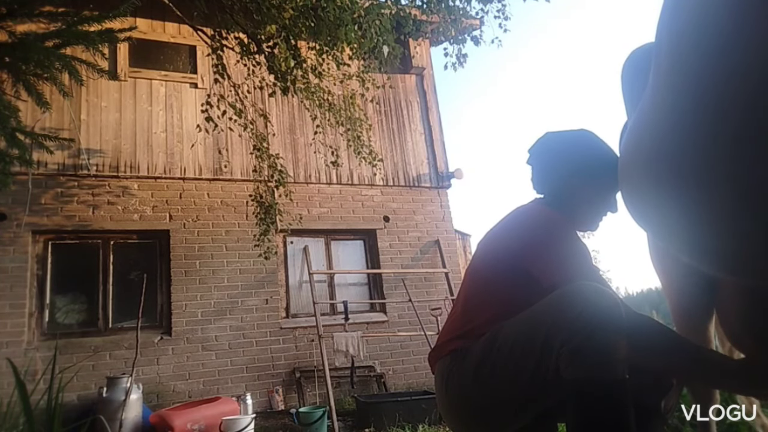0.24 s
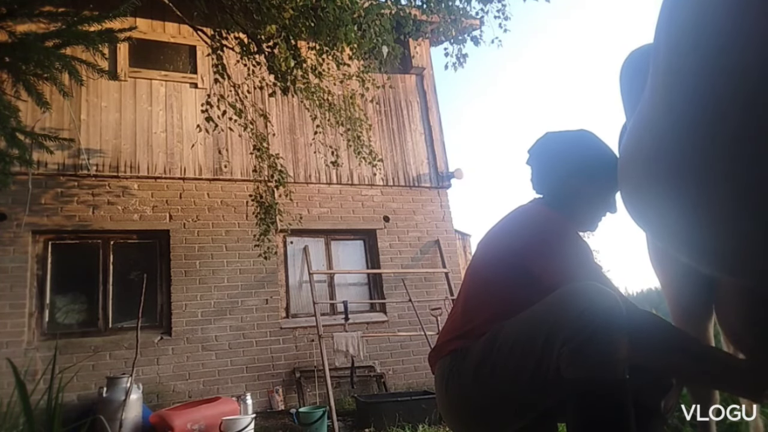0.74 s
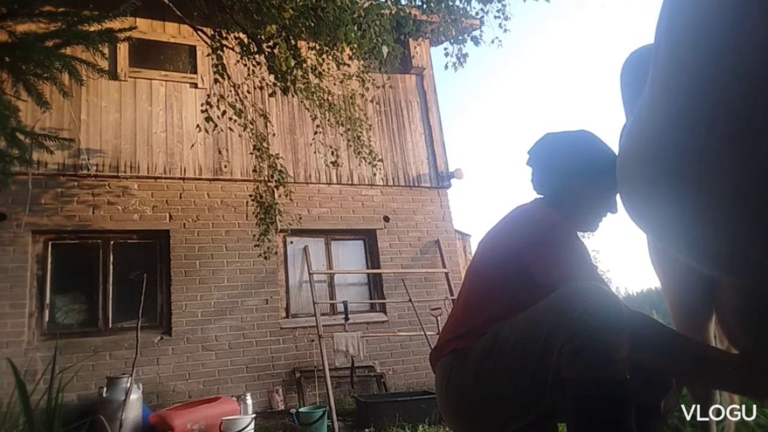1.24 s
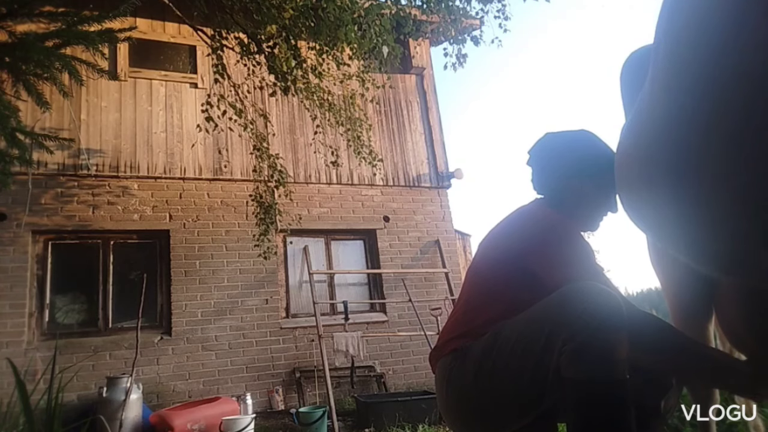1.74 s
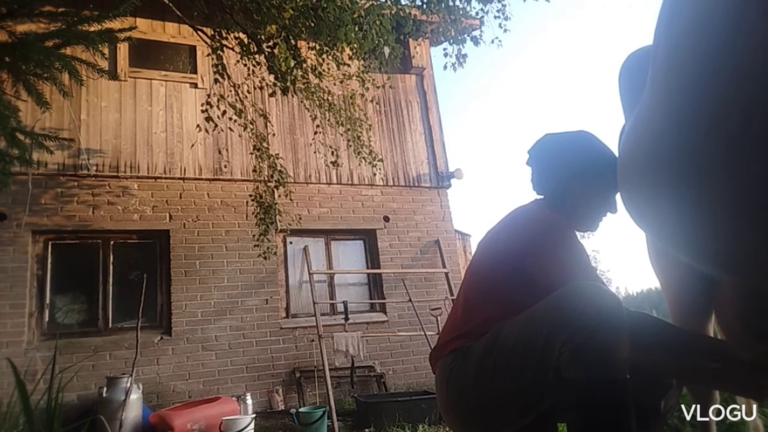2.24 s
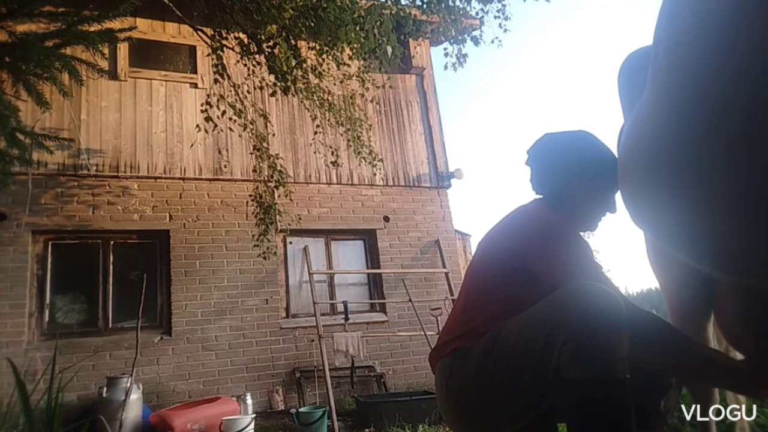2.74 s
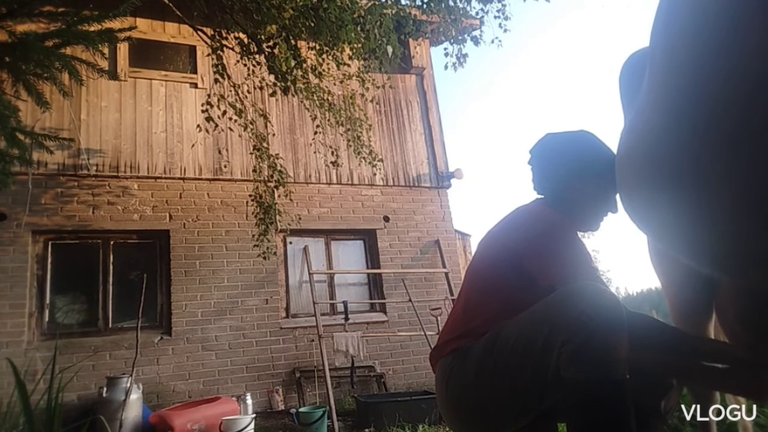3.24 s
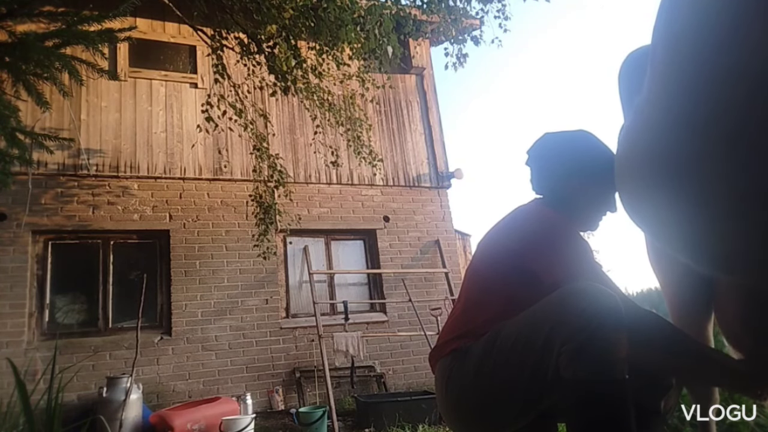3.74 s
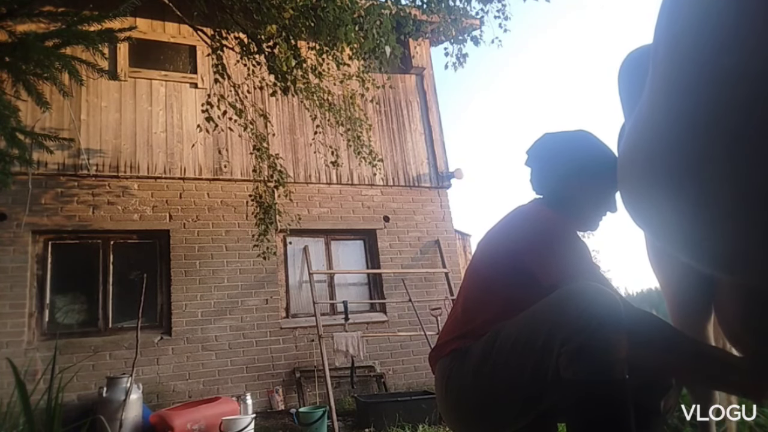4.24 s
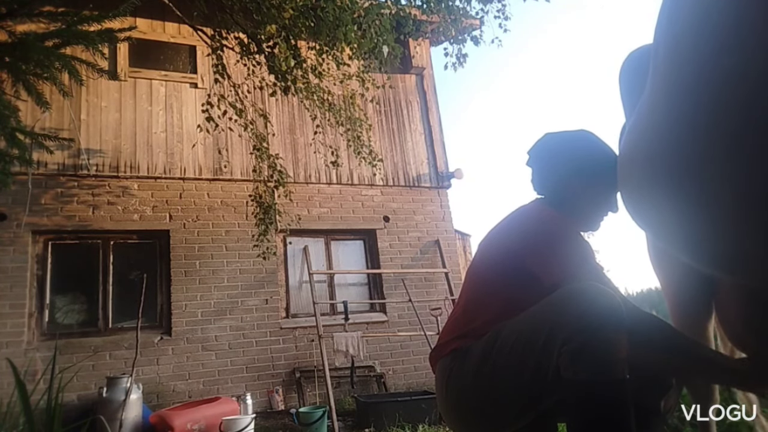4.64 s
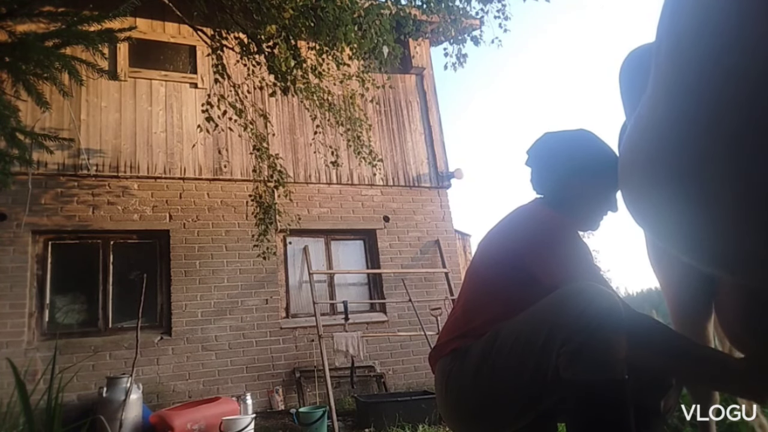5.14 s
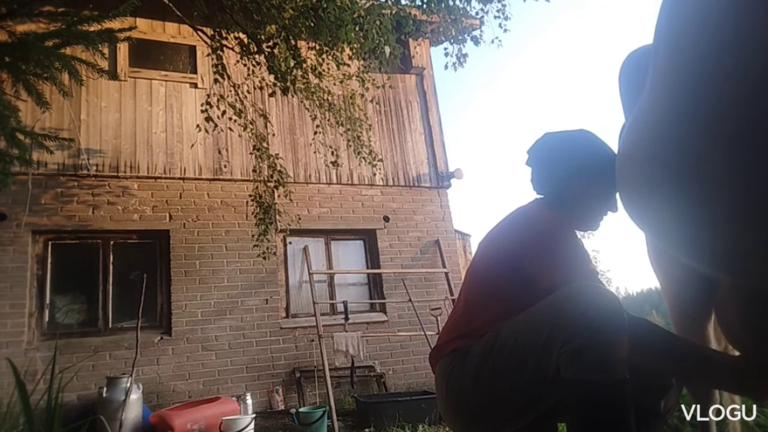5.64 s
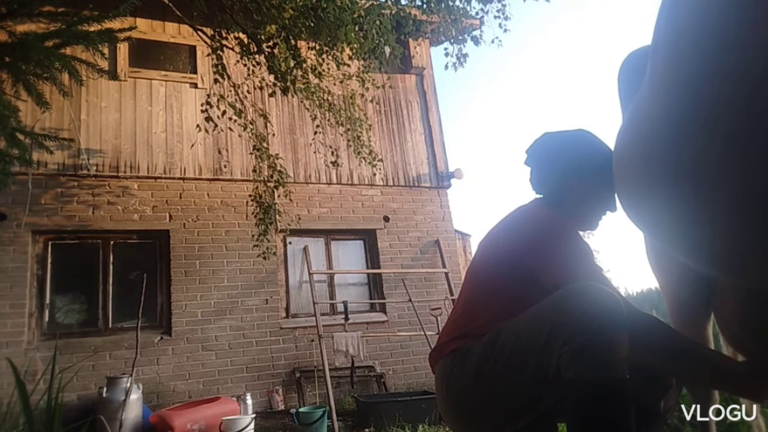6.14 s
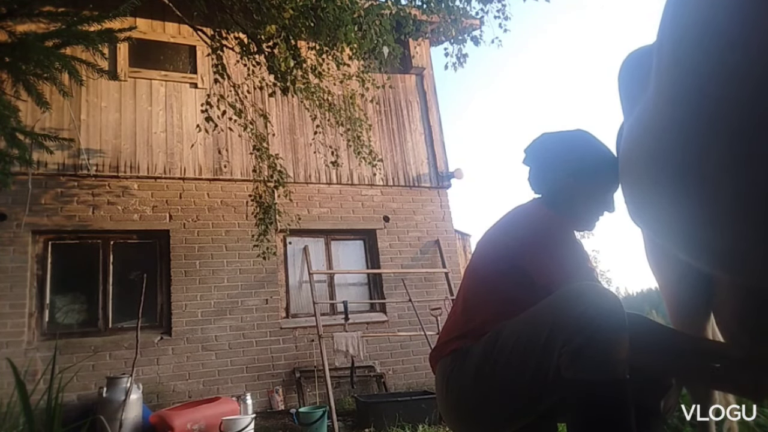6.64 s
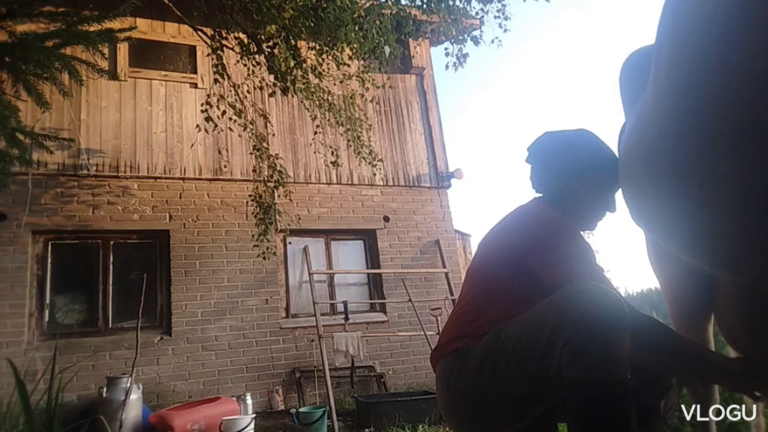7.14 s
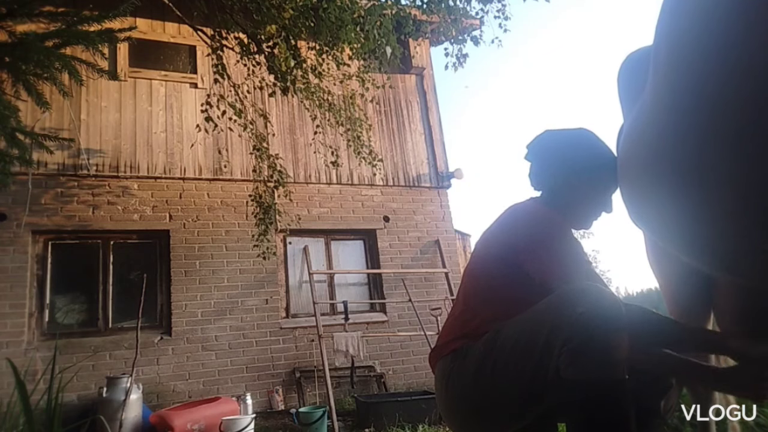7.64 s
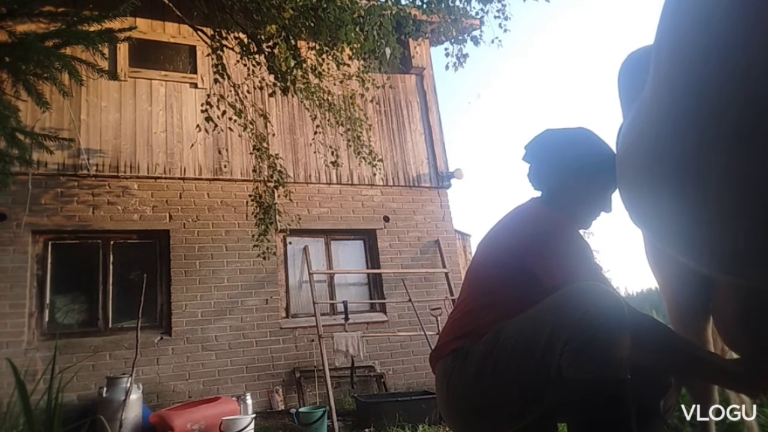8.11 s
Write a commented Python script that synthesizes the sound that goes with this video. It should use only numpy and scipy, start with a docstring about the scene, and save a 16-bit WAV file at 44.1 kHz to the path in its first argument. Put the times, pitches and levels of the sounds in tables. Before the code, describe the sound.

Close by and slightly left, milk squirts by hand into a metal pail. About once a second a bright, sputtering hiss swells against the wall, dulling into froth; between these come shorter, softer bubbling jets in the foam. Wet plops, gurgles, ticks and brief metallic clinks are scattered throughout. The outdoor setting is almost silent and dry, the microphone slightly dull.

```python
"""Outdoors, a little to the left of the microphone: a cow is milked by hand into a metal pail.
Alternating jets: one is filtered noise and droplets hissing on the wall, the other crowds of decaying
sine bubbles in the froth and milk. Now and then milk plops, a chirped sine with a noise splash, and the
pail is knocked: damped modes clink briefly. Hums, gurgles and ticks fill in; air rushes very faintly."""
import sys
import numpy as np
from scipy import signal
from scipy.fft import rfft, irfft
from scipy.io import wavfile
from scipy.ndimage import uniform_filter1d

SR = 44100
rng = np.random.default_rng(int(sys.argv[2]) if len(sys.argv) > 2 else 0)


def wrap_up_sound(samples):
    """Save the sound to the file named by the first command line argument, as 16-bit audio."""
    columns = np.atleast_2d(samples).T
    # keep every value between -1 and 1, then stretch to whole-number steps
    tamed = np.clip(columns, -1, 1)
    steps = np.round(tamed * 32767).astype(np.int16)
    wavfile.write(sys.argv[1], SR, steps)


N = 369116

LAG_S = 0.00023  # sound reaches the left port first
CLOCK_S = np.arange(0, N + 64, 64) / SR  # control clock of the flows


def amp(db):
    """Decibels to gain."""
    return 10 ** (np.asarray(db) / 20)


def unit(x):
    """Scales to rms 1."""
    return x / np.sqrt(np.mean(x ** 2) + 1e-20)


def read(points, hz):
    """Reads a table on a log-frequency axis."""
    f, value = np.transpose(points)
    return np.interp(np.log(hz + 1), np.log(f + 1), value)


def add(mix, s, sound):
    """Adds a sound at time s."""
    part = mix[..., max(round(s * SR), 0):][..., :sound.shape[-1]]
    part += sound[..., :part.shape[-1]]


def level(curve):
    """Gain of a level curve at every sample."""
    s, db = np.transpose(curve)[:2]
    return amp(np.interp(np.arange(N) / SR, s, db))


# Relative spectrum of the spray. Each row: frequency in Hz, density in dB per Hz.
SPRAY_COLOUR = [(100, -27), (250, -9), (350, -11), (460, -11), (570, -13.5), (700, -0.5), (850, -14.5),
                (1100, -10), (1350, 1.5), (1650, -1), (1900, -3.5), (2600, 2), (2950, -0.5), (4000, -3),
                (4600, -4), (5900, -6.5), (6500, -17), (7200, -24), (7800, -50), (9000, -69), (15000, -64)]


def hiss(mist_db=-3, sputter_db=1.0, full_jet_db=-53):
    """A full jet breaks into fine spray that sputters on the wall; a weak one leaves separate drips."""
    sputter = amp(sputter_db * unit(uniform_filter1d(rng.standard_normal(N), size=350)))
    droplets = patter(per_s=1500, spread_db=2.1)
    mist = amp(mist_db) * rng.standard_normal((2, N))
    spray = landing_spot((droplets + mist) * sputter)
    flow = spray_flow()
    force = 1 / (1 + (amp(full_jet_db) / level(flow)) ** 2)  # power share of the full jet
    full = np.sqrt(force) * sweep(pail_walls(spray, t60_s=0.057, wet_db=-4.0))
    weak = np.sqrt(1 - force) * pail_walls(drips(), t60_s=0.031, wet_db=1.5)
    sound = from_pail(full + weak, SPRAY_COLOUR, size=1024, brightness=flow[:, ::2], patchy_db=3.0)
    return level(flow) * sound


def patter(per_s, spread_db):
    """Droplets of all sizes landing at random."""
    sizes = amp(spread_db * np.minimum(rng.exponential(1, N), 4)) * rng.choice([-1, 1], (2, N))
    return unit(sizes * (rng.random(N) < per_s / SR))


def drips(dull_hz=4600):
    """Tiny bubbles burst on the froth as short pings that merge into a soft, dull trickle."""
    pings = bubbling(1500, 4200, cycles=15, rise=0, spread_db=9, wash_db=1, count=6000)
    return signal.sosfilt(signal.butter(N=2, Wn=dull_hz, fs=SR, output="sos"), pings)


def landing_spot(x, centre_hz=3200, roam=0.22, width_hz=450, lift_db=-1):
    """The patch of wall under the jet resonates, and its pitch roams as the aim shifts."""
    spot_hz = centre_hz * np.exp(roam * wander(per_s=10))
    turn = np.exp(2j * np.pi * np.cumsum(spot_hz) / SR)
    r = np.exp(-np.pi * width_hz / SR)
    baseband = signal.lfilter([1 - r], [1, -r], x / turn)
    return unit(x + amp(lift_db) * 2 * (turn * baseband).real)


def wander(per_s):
    """A slow random curve of about unit size."""
    knots = np.arange(0, N / SR + 1, 1 / per_s)
    return np.interp(np.arange(N) / SR, knots, rng.standard_normal(len(knots)))


def pail_walls(x, t60_s, wet_db):
    """Sound bounces between the walls: a dense, short decaying tail."""
    t = np.arange(SR // 10) / SR
    tail = rng.standard_normal((2, len(t))) * amp(-60 * t / t60_s)
    tail /= np.linalg.norm(tail, axis=1, keepdims=True)
    return unit(x + amp(wet_db) * signal.fftconvolve(x, tail, axes=1)[:, :N])


# Squirts against the wall. Each row: start in seconds, length in seconds, hardest squeeze as share of
# the length, spray in dB, brightness in dB per octave, froth in dB, churn in dB before the churn's trim,
# time the jet reaches the froth in seconds.
WALL_SQUIRTS = [(-0.06, 0.51, 0.54, -33.5, -0.5, -49, -63.5, 0.24),
                (0.954, 0.39, 0.38, -41, 1, -56.5, -62.5, 0.83),
                (1.831, 0.47, 0.59, -33.5, -1, -48, -53.5, 2.12),
                (2.81, 0.46, 0.48, -36, 0, -44.5, -45.5, 2.85),
                (3.627, 0.5, 0.46, -29, -1, -43.5, -55.5, 3.87),
                (4.507, 0.45, 0.4, -33.5, -2.5, -42, -45.5, 4.69),
                (5.333, 0.49, 0.28, -39.5, -2, -49, -55, 5.5),
                (6.277, 0.46, 0.33, -40.5, -1, -45.5, -52, 6.46),
                (7.145, 0.4, 0.39, -44, -1, -46.5, -67.5, 7.23),
                (7.973, 0.43, 0.46, -43, 2, -48, -61.5, 8.3)]
ECHO_FIRST_S, ECHO_LAST_S, ECHO_DB = .0011, .00062, -8


def sweep(x):
    """The spray meets its echo off the near wall, sooner as the jet slides; the colour sweeps upward."""
    starts, lengths = np.transpose(WALL_SQUIRTS)[:2]
    at = np.arange(N)
    times = np.ravel([starts, starts + lengths], "F")
    delay_s = np.interp(at / SR, times, np.tile([ECHO_FIRST_S, ECHO_LAST_S], len(starts)))
    echo = np.array([np.interp(at - delay_s * SR, at, port) for port in x])
    return unit(x + amp(ECHO_DB) * echo)


# Squirts into the froth. Each row: start in seconds, length in seconds, froth in dB, spray in dB,
# churn in dB before the churn's trim.
FROTH_SQUIRTS = [(-0.05, 0.2, -52.5, -54.5, -58.5), (0.477, 0.33, -53.5, -65.5, -60),
                 (0.758, 0.18, -52, -62.5, -56), (1.07, 0.15, -57.5, -64.5, -67.5),
                 (1.526, 0.19, -58, -60.5, -63.5), (1.675, 0.18, -50.5, -57.5, -57.5),
                 (2.272, 0.56, -53, -63, -63), (3.216, 0.57, -42, -53, -43.5),
                 (4.14, 0.096, -49, -63, -53.5), (4.244, 0.1, -55.5, -70.5, -60.5),
                 (4.36, 0.3, -51.5, -57.5, -60), (5.029, 0.31, -62.5, -76, -72.5),
                 (5.209, 0.097, -52, -62.5, -69.5), (5.81, 0.17, -54.5, -70, -65.5),
                 (5.991, 0.23, -50.5, -60.5, -61), (6.722, 0.31, -51.5, -67.5, -63.5),
                 (7.002, 0.12, -52.5, -66.5, -62.5), (7.63, 0.26, -56, -71.5, -65)]
# Stray spits of spray. Each row: start in seconds, length in seconds, level in dB.
SPITS = [(0.405, 0.065, -68), (0.474, 0.05, -57), (0.652, 0.11, -53), (0.783, 0.12, -53),
         (1.343, 0.062, -69.5), (1.455, 0.079, -53), (2.336, 0.14, -56.5), (3.285, 0.059, -40),
         (4.16, 0.034, -53.5), (4.346, 0.072, -40), (4.906, 0.048, -55.5), (5.818, 0.069, -47),
         (6.753, 0.035, -56), (6.838, 0.061, -58), (7.5, 0.077, -72.5), (7.8, 0.051, -68.5)]
SPRAY_RISE_DB, SPRAY_SAG_DB = 14.5, 38.5  # builds up to the hardest squeeze, then slackens
FRESH_TILT_DB, DULLING_DB = 2.5, 4.5  # dB per octave: a jet starts bright and dulls towards its end
PLUNGE_SPRAY_TILT_DB, SPIT_TILT_DB = -3, -3  # dB per octave


def spray_flow():
    """Spray is strong and bright off the wall, faint and dull off the froth."""
    flows = []
    for s, length, top, db, bright, _, _, _ in WALL_SQUIRTS:
        gain = amp(db) * arch(s, length, top, SPRAY_RISE_DB, SPRAY_SAG_DB, OPEN_S, CLOSE_S)
        flows.append((gain, bright + FRESH_TILT_DB - DULLING_DB * progress(s, length)))
    flows += [(amp(db) * plunge(s, length), PLUNGE_SPRAY_TILT_DB) for s, length, _, db, _ in FROTH_SQUIRTS]
    flows += [(amp(db) * surge(s, length), SPIT_TILT_DB) for s, length, db in SPITS]
    return together(flows, rest_db=-84.5, waver_db=0.6, waver_s=0.012)


# Relative spectrum of the froth. Each row: frequency in Hz, density in dB per Hz.
FROTH_COLOUR = [(300, -20), (550, 0.5), (680, -2), (850, 2), (1120, 4.5), (1300, -2), (1700, -21.5),
                (3000, -46)]


def froth():
    """The jet drives small bubbles into the foam."""
    drive = bubbling(600, 1400, cycles=9, rise=.02, spread_db=19, wash_db=5.5, count=2800)
    flow = froth_flow()
    return level(flow) * from_pail(drive, FROTH_COLOUR, size=1024, brightness=flow[:, ::2])


# the slackening jet slides off the wall into the froth; top as share of the length
FROTH_TOP, FROTH_RISE_DB, FROTH_SAG_DB = 0.66, 27.5, 19
# dB per octave: bubbles grow as a wall squirt slackens, so the tilt falls
FINE_FOAM_TILT_DB, COARSENING_DB, PLUNGE_FROTH_TILT_DB = 11, 15.5, 3.5


def froth_flow():
    """The froth bubbles late in each wall squirt, ever deeper, and all through each plunging one."""
    flows = []
    for s, length, _, _, _, db, _, slide in WALL_SQUIRTS:
        swell = arch(s, length, FROTH_TOP, FROTH_RISE_DB, FROTH_SAG_DB, OPEN_S, CLOSE_S)
        tilt = FINE_FOAM_TILT_DB - COARSENING_DB * progress(s, length)
        flows.append((amp(db) * landed(slide) * swell, tilt))
    flows += [(amp(db) * plunge(s, length), PLUNGE_FROTH_TILT_DB) for s, length, db, _, _ in FROTH_SQUIRTS]
    return together(flows, rest_db=-83, waver_db=1.5, waver_s=0.015)


# Relative spectrum of the churned milk. Each row: frequency in Hz, density in dB per Hz.
CHURN_COLOUR = [(25, -44.5), (50, -31.5), (75, -12.5), (100, -15), (135, -4), (175, -15.5), (250, -8.5),
                (330, 1.5), (450, -3.5), (560, -15), (800, -19.5), (2000, -73)]


def churn(trim_db=-2):
    """Large pockets of air gurgle below the foam."""
    drive = bubbling(150, 530, cycles=5.7, rise=0.023, spread_db=13.5, wash_db=9.5, count=1300)
    flow = churn_flow()
    sound = from_pail(drive, CHURN_COLOUR, size=2048, brightness=flow[:, ::2])
    return amp(trim_db) * level(flow) * sound


# The milk heaves as a jet drags air under. Each row: start in seconds, length in seconds,
# level in dB before the churn's trim, brightness in dB per octave.
HEAVES = [(0.548, 0.07, -54.5, 7), (0.728, 0.19, -43, 13), (0.939, 0.14, -60.5, 12.5),
          (1.127, 0.2, -47.5, 24.5), (1.337, 0.059, -73, 2.5), (1.704, 0.18, -49.5, 6),
          (1.963, 0.21, -41, 3), (2.608, 0.19, -52, 5), (3.403, 0.15, -37, 4.5), (3.918, 0.19, -42.5, -10),
          (4.603, 0.13, -51.5, -2), (4.714, 0.1, -38.5, 0), (4.908, 0.053, -46.5, 0),
          (5.044, 0.046, -62, -0.5), (5.541, 0.058, -49.5, 0), (5.662, 0.11, -48, 11),
          (6.598, 0.11, -40, 5.5), (6.593, 0.36, -52.5, -6.5), (7.363, 0.17, -52, 18.5),
          (7.978, 0.17, -55, 9.5), (8.309, 0.055, -50.5, -7)]
CHURN_TOP, CHURN_RISE_DB, CHURN_SAG_DB = 0.87, 20.5, 0
CHURN_TILT_DB, PLUNGE_CHURN_TILT_DB = -0.5, 1.5  # dB per octave


def churn_flow():
    """Every squirt stirs the milk; now and then it heaves."""
    flows = []
    for s, length, _, _, _, _, db, slide in WALL_SQUIRTS:
        swell = arch(s, length, CHURN_TOP, CHURN_RISE_DB, CHURN_SAG_DB, OPEN_S, CLOSE_S)
        flows.append((amp(db) * landed(slide) * swell, CHURN_TILT_DB))
    flows += [(amp(db) * plunge(s, length), PLUNGE_CHURN_TILT_DB) for s, length, _, _, db in FROTH_SQUIRTS]
    flows += [(amp(db) * surge(s, length), bright) for s, length, db, bright in HEAVES]
    return together(flows, rest_db=-79.5, waver_db=2.0, waver_s=0.028)


def progress(start, length):
    """Runs from 0 to 1 during an event."""
    return np.clip((CLOCK_S - start) / length, 0, 1)


OPEN_S, CLOSE_S = 0.048, 0.082  # the hand starts and cuts off the jet
ARCH_POWER = 2.04  # higher = a squeeze holds its top longer


def arch(start, length, top, rise_db, sag_db, open_s, close_s):
    """Gain of one flow: it opens, swells to its top, sags and closes."""
    along, top = progress(start, length), np.clip(top, .05, .95)
    before = np.maximum(1 - along / top, 0)
    after = np.maximum((along - top) / (1 - top), 0)
    db = -rise_db * before ** ARCH_POWER - sag_db * after ** ARCH_POWER
    opening = np.clip((CLOCK_S - start) / open_s, 0, 1)
    closing = np.clip((start + length - CLOCK_S) / close_s, 0, 1)
    return amp(db) * (opening * closing) ** 2


PLUNGE_EDGE_S, PLUNGE_TOP, PLUNGE_RISE_DB, PLUNGE_SAG_DB = 0.016, 0.74, 3.5, 14


def plunge(start, length):
    """Gain of a squirt into the froth, which runs more evenly."""
    return arch(start, length, PLUNGE_TOP, PLUNGE_RISE_DB, PLUNGE_SAG_DB, PLUNGE_EDGE_S, PLUNGE_EDGE_S)


SURGE_EDGE_S, SURGE_TOP, SURGE_RISE_DB, SURGE_SAG_DB = 0.015, .45, 4.5, 16.5


def surge(start, length):
    """Gain of a spit or a heave: it swells and dies in one arch."""
    return arch(start, length, SURGE_TOP, SURGE_RISE_DB, SURGE_SAG_DB, SURGE_EDGE_S, SURGE_EDGE_S)


SLIDE_S, OFF_FROTH_DB = 0.031, -14.5  # until the jet arrives only stray drops stir the froth


def landed(slide):
    """Gain that steps up when a wall squirt slides into the froth."""
    return amp(OFF_FROTH_DB * np.clip((slide + SLIDE_S - CLOCK_S) / SLIDE_S, 0, 1))


def together(flows, rest_db, waver_db, waver_s):
    """Joins (gain, brightness) flows into one unsteady curve: (s, level dB, brightness dB per octave)."""
    power = sum(gain ** 2 for gain, _ in flows) + amp(rest_db) ** 2
    tilt = sum(gain ** 2 * bright for gain, bright in flows) / power
    knots = np.arange(0, CLOCK_S[-1] + waver_s, waver_s)
    waver = np.interp(CLOCK_S, knots, rng.standard_normal(len(knots)))
    return np.transpose([CLOCK_S, 10 * np.log10(power) + waver_db * waver, tilt])


def bubble(hz, cycles, rise):
    """A bubble rings and rises in pitch as it nears the surface; it falls to 1/e in the given cycles."""
    turns = np.arange(int(5 * cycles * SR / hz) + 2) * hz / SR
    tone = np.sin(2 * np.pi * turns * (1 + rise * turns / cycles))
    return tone * np.exp(-turns / cycles) * (1 - np.exp(-2 * turns))


def bubbling(low_hz, high_hz, cycles, rise, spread_db, wash_db, count):
    """A crowd of bubbles of all sizes over a wash of unresolved ones; direct and scattered."""
    out = np.zeros((2, N))
    for when, pitch, size, side in rng.random((count, 4)):
        hz = low_hz * (high_hz / low_hz) ** pitch
        ring = amp(spread_db * size) * bubble(hz, cycles, rise)
        add(out, when * N / SR, np.outer([1, 2 * side - 1], ring))
    return np.array([unit(port) for port in out]) + amp(wash_db) * rng.standard_normal((2, N))


def spectra(x, size):
    """Short-time spectra: Hz, s, bins x frames."""
    return signal.stft(x, nperseg=size, noverlap=size * 3 // 4, fs=SR)


# Air resonances inside the pail. Each row: frequency in Hz, width in Hz, lift in dB.
CAVITY = [(178, 12, 9), (209, 12, 7), (245, 14, 7), (290, 30, 3), (468, 25, 4), (680, 70, 7), (830, 40, 3),
          (1015, 40, 3), (1100, 35, 4), (1560, 150, 6), (2020, 70, 4), (2600, 130, 5), (2860, 160, 3),
          (3660, 190, 4), (4160, 120, 4), (4800, 150, 2), (5370, 130, 4), (5750, 140, 4)]
# Left over right port. Each row: frequency in Hz, level difference in dB.
BALANCE_DB = [(100, 5.96), (260, 3.48), (480, 6.47), (720, 8.35), (930, 3.92), (1200, 8.44), (2500, 11.98),
              (3500, 7.49), (6500, 5.8)]
# Likeness of the ports. Each row: frequency in Hz, likeness from 0 to 1.
LIKENESS = [(50, 0.58), (170, 0.91), (400, 0.12), (800, 0.072), (1300, 0.88), (2500, 0.39), (6000, 0.051)]


def from_pail(drives, colour, size, brightness=((0, 0), (1, 0)), patchy_db=0):
    """Rings a direct and a scattered drive in the pail's air and carries them to both ports; left rms 1."""
    ringing = sum((amp(lift) - 1) * signal.lfilter(*signal.iirpeak(f, f / width, SR), drives)
                  for f, width, lift in CAVITY)
    hz, t, (direct, scattered) = spectra(drives + ringing, size)
    db = read(colour, hz)
    centre_hz = np.average(hz, weights=amp(db) ** 2)
    octaves = np.clip(np.log2((hz + 1) / centre_hz), -1, 1)
    # the colour shifts in patches as the landing spot wanders
    patches = uniform_filter1d(rng.standard_normal(direct.shape), size=7, axis=0)
    patches = unit(uniform_filter1d(patches, size=9, axis=1))
    tilt_db = octaves[:, None] * np.interp(t, *np.transpose(brightness))
    gain = amp(db[:, None] + tilt_db + patchy_db * patches)
    gain /= np.linalg.norm(gain, axis=0)  # colour only: every frame keeps the same total
    same = np.clip(read(LIKENESS, hz), 0, 1)[:, None]
    shade = (amp(-read(BALANCE_DB, hz)) * np.exp(-2j * np.pi * hz * LAG_S))[:, None]
    right = shade * (same * direct + np.sqrt(1 - same ** 2) * scattered)
    ports = np.array([direct, right]) * gain
    out = signal.istft(ports, nperseg=size, noverlap=size * 3 // 4)[1][:, :N]
    return out / np.std(out[0])


# The hollow of the pail. Each row: frequency in Hz, width in Hz, gain over the churn in dB.
HOLLOW = [(180, 5.6, -3.5), (203, 4.8, -9.5), (241, 13, -3.5), (470, 9.9, -5.5)]


def hollow(stirring):
    """Narrow air resonances hum on after the milk stirs them, swelling and dying more slowly."""
    return sum(amp(db) * signal.lfilter(*signal.iirpeak(hz, hz / width, SR), stirring)
               for hz, width, db in HOLLOW)


# Low hums of the pail's air. Each row: start in seconds, length in seconds, frequency in Hz,
# level in dB before the trim.
HUMS = [(-0.03, 0.36, 256, -60), (1.99, 0.25, 176, -55), (3.02, 0.4, 179, -58), (3.91, 0.18, 172, -50),
        (4.62, 0.25, 240, -51), (6.62, 0.28, 250, -53), (6.63, 0.5, 178, -58), (7.98, 0.19, 250, -61),
        (7.98, 0.25, 690, -66)]


def hums(waver_db=2.6, waver_hz=6, trim_db=-0.5, right_db=-4):
    """Wavering low tones of the pail's air, each swelling and fading at its own time."""
    out = np.zeros(N)
    for start, length, hz, db in HUMS:
        half_sine = np.sin(np.pi * progress(start, length)).clip(0)
        swell = np.interp(np.arange(N) / SR, CLOCK_S, half_sine ** .5)
        turns = np.cumsum(hz + waver_hz * wander(per_s=23)) / SR
        tone = np.sqrt(2) * np.sin(2 * np.pi * turns)
        out += swell * amp(db + waver_db * wander(per_s=51)) * tone
    return amp(trim_db) * np.array([out, amp(right_db) * out])


# Bubble chains; as a jet slackens its bubbles grow and the pitch mostly falls. Each row: start in
# seconds, end in seconds, first frequency in Hz, last frequency in Hz, level in dB.
GURGLES = [(0.282, 0.396, 700, 645, -53.5), (0.755, 0.935, 434, 271, -48.5), (1.186, 1.277, 614, 483, -58),
           (0.95, 1.038, 348, 400, -60), (1.323, 1.412, 344, 305, -55.5), (1.917, 1.999, 700, 644, -52),
           (2.0, 2.12, 329, 188, -50), (3.951, 4.08, 424, 198.7, -44), (4.728, 4.855, 102.2, 70.5, -52),
           (4.735, 4.835, 200.6, 189, -39.5), (5.576, 5.782, 734, 318.4, -63.5),
           (6.62, 6.711, 380, 240, -56.5), (7.274, 7.495, 694, 396.8, -58), (8.265, 8.335, 695, 745, -47.5)]


def gurgles(cycles=4.4, rise=0.022, scatter=0.2, bubbles_per_s=150, right_db=-5):
    """Chains of distinct bubbles, mostly growing as they go."""
    out = np.zeros((2, N))
    for start, end, first_hz, last_hz, db in GURGLES:
        chain = np.zeros(int((end - start) * SR))
        for s in np.arange(0, end - start, 1 / bubbles_per_s):
            late, size, pitch = rng.uniform(-1.026, 1, 3)
            hz = first_hz * (last_hz / first_hz) ** (s / (end - start)) * np.exp(scatter * pitch)
            add(chain, s + .5 * late / bubbles_per_s, 2 ** size * bubble(hz, cycles, rise))
        chain = amp(db) * unit(chain) * signal.windows.tukey(len(chain), .5)
        add(out[0], start, chain)
        add(out[1], start + LAG_S, amp(right_db) * chain)
    return out


def puff(decay_s, rise_s=0.00028):
    """Envelope of a short burst: exponential rise and decay."""
    t = np.arange(SR // 8) / SR
    return np.exp(-t / decay_s) * (1 - np.exp(-t / rise_s))


# Relative spectrum of a plop's splash. Each row: frequency in Hz, density in dB per Hz.
SPLASH_COLOUR = [(60, -48.5), (400, -13.5), (1000, -4.5), (2000, -4), (3000, -1), (4200, -3), (6000, -19),
                 (8000, -51.5)]
# Single plops. Each row: start in seconds, bubble in dB before its trim, bubble pitch in Hz,
# splash in dB before its trim.
PLOPS = [(0.496, -40.5, 1025, -73), (0.644, -53, 900, -52), (0.772, -33, 407, -61), (0.838, -36, 686, -55),
         (0.902, -49, 1085, -66), (1.095, -42, 1040, -55.5), (1.188, -35.5, 1053, -39.5),
         (2.068, -31.5, 960, -50), (2.186, -35, 1120, -62), (2.343, -46, 1026, -48.5),
         (2.385, -60, 1070, -47), (2.408, -39, 775, -80), (3.322, -35.5, 770, -45), (3.461, -21, 293, -49),
         (3.503, -23.5, 1040, -41), (4.575, -37, 1038, -55), (4.734, -23.5, 206, -40),
         (4.765, -36.5, 422, -39), (4.803, -34, 949, -40.5), (4.853, -26.5, 245, -49),
         (4.914, -34, 284, -68), (5.592, -36, 637, -41.5), (5.638, -34.5, 1040, -75),
         (5.674, -33.5, 744, -60), (5.702, -38.5, 1050, -58), (5.727, -34, 328, -66),
         (5.747, -37, 300, -73), (5.829, -47, 950, -40), (6.627, -33.5, 303, -65.5),
         (6.642, -33.5, 253, -65.5), (6.754, -34.5, 874, -54.5), (6.849, -46, 1070, -53),
         (6.956, -43, 858, -63), (6.971, -37.5, 877, -63), (7.302, -43.5, 641, -68.5),
         (7.45, -44.5, 415.4, -69), (7.82, -40, 698, -68), (8.234, -39, 896, -52), (8.264, -48, 622, -36.5),
         (8.294, -38, 750, -58), (8.347, -37, 231, -70)]
SPLASH_S = .009


def plops(ring_s=.005, rise=.018, bubble_trim_db=2, splash_trim_db=1, right_db=-5):
    """A slug of milk lands: a short splash and one big bubble."""
    out, burst = np.zeros((2, N)), np.zeros(N)
    for s, db, hz, wet_db in PLOPS:
        ring = amp(db + bubble_trim_db) * bubble(hz, ring_s * hz, rise)
        add(out[0], s, ring)
        add(out[1], s + LAG_S, amp(right_db) * ring)
        add(burst, s, amp(wet_db + splash_trim_db) * puff(SPLASH_S, rise_s=.0007))
    splash = pail_walls(rng.standard_normal((2, N)), t60_s=0.0053, wet_db=14.0)
    return out + burst * from_pail(splash, SPLASH_COLOUR, size=512, patchy_db=4)


# Wet ticks as a drop smacks the foam or a bubble pops. Each row: start in seconds, level in dB,
# frequency in Hz.
TICKS = [(0.496, -51, 2830), (2.354, -54, 4000), (2.387, -51, 3900), (2.388, -49, 2948), (4.736, -37, 1900),
         (4.737, -37, 900), (4.801, -46, 4300), (4.854, -41, 2300), (4.881, -57, 5800), (4.916, -41, 1100),
         (5.551, -50, 5860), (5.708, -53.5, 3980), (6.754, -46.5, 2300), (6.956, -46.5, 999),
         (8.265, -40, 4410)]


def ticks(ring_s=0.007, width_share=0.17, right_db=-8):
    """Each tick is a short burst in the resonance of a small pocket of air."""
    out = np.zeros((2, N))
    for s, db, hz in TICKS:
        shape = puff(ring_s)
        band_hz = [hz * (1 - width_share), hz * (1 + width_share)]
        pocket = signal.butter(N=3, Wn=band_hz, btype="band", fs=SR, output="sos")
        burst = unit(signal.sosfilt(pocket, rng.standard_normal((2, len(shape)))))
        add(out, s, amp(db) * amp([[0], [right_db]]) * shape * burst)
    return out


# Knocks on the pail. Each row: start in seconds, strength in dB, hardness in dB per octave, place round
# the wall in steps, place up the wall in steps, slant of the blow in steps, damping as a factor,
# splash in dB relative to the ring.
CLINKS = [(1.147, -37.5, 2, 0.45, -0.24, 0.56, 1.37, -26),
          (1.558, -44.5, 2.5, 0.68, -0.49, -0.18, 1.36, -32.0),
          (1.865, -37.5, -3, 0.21, 0.51, 0.057, 0.86, -18), (2.273, -41, 0, 0.094, 0.21, -0.36, 0.85, -33),
          (2.594, -40.5, -3.5, 0.44, 0.43, -0.24, 1.12, -19),
          (2.987, -30, 0.8, 0.23, -0.26, -0.1, 1.05, -15.5),
          (3.24, -29, -0.1, 0.14, 0.5, 0.49, 0.97, -32.0),
          (3.318, -40.5, 1.5, 0.35, 0.17, 0.45, 1.34, -12.5),
          (3.426, -29, -6, -0.22, -0.35, -0.48, 0.82, -31),
          (3.475, -20, -0.2, -0.83, -0.33, 0.94, 1, -19.5),
          (3.581, -33, -5.4, -0.65, -0.11, 0.69, 0.92, -8.5),
          (4.149, -50.5, -11.5, -0.23, -0.03, -0.26, 1.12, -20.0),
          (4.378, -35, -2.5, 0.15, 0.3, 0.12, 0.97, -15),
          (4.913, -49.5, -5.5, 0.046, -0.28, -0.11, 2.5, -14),
          (4.992, -68.5, 10, 0.0, -0.28, 0.0, 2.2, -30), (5.51, -38.5, 0.5, 0.4, -0.23, -0.29, 0.97, -24),
          (5.791, -34.5, 5.5, 0.025, -0.65, 0.59, 0.81, -29.5),
          (6.048, -35, 2, 0.38, 0.29, 0.29, 1.17, -20.5), (6.541, -34, 0, 0.28, 0.24, -0.35, 1.15, -19.0),
          (7.04, -43.5, -2, -0.0, 1, -0.82, 1.17, -25.5), (7.636, -54.5, -1, -0.26, 0.71, -0.11, 1.3, -30)]
# Modes of the pail. Each row: frequency in Hz, level in dB, t60 in seconds at damping 1, dB per step
# round, dB per step up, dB per step of slant, left over right in dB, left lead in radians.
PAIL = [(1014.0, 2.4, 0.277, -2.0, 4.0, 1.0, 2.0, -2.7), (1290, -19, 0.07, -5, 0, 0, 3, 2.4),
        (1395.0, -12.0, 0.141, 2.0, 0.0, -7.0, 1.0, -0.9),
        (1484.0, 5.0, 0.154, -5.0, -1.0, -6.0, 2.0, -0.9),
        (2026.0, -6.1, 0.184, -10.0, -6.0, 2.0, 10.0, 0.7), (2130, -20, 0.06, -12, 0, 2, 10, 0.9),
        (2560.0, -2.4, 0.198, -10.0, 18.0, 3.0, 13.0, 2.2),
        (2650.0, -3.6, 0.173, 8.0, -6.0, -5.0, 16.0, 2.9), (3243.0, -6.5, 0.172, 1.0, 2.0, 5.0, 18.0, 4.1),
        (3463.0, -6.3, 0.178, 11.0, 6.0, -9.0, 18.0, 4.0), (3670, -19, 0.05, -8, 0, 5, 12, 4.6),
        (3766.0, -11.3, 0.129, -5.0, -8.0, 13.0, 12.0, 4.8),
        (4110.0, -9.4, 0.131, 14.0, 14.0, 3.0, 10.0, 6.2), (4282.0, -7.2, 0.173, 1.0, -2.0, -5.0, 9.0, 6.3),
        (4870, -16, 0.035, 3, 3, 0, 10, 8.5), (5120.0, -16.6, 0.112, 6.0, -7.0, 3.0, 12.0, 9.7),
        (5607.0, -18, 0.12, -10.0, 3.0, -7, 10.0, 10.5), (5841.0, -16.8, 0.128, 3.0, -4.0, -3.0, 9.0, 11.3),
        (6248, -28, 0.09, -9, -2, 4, 6, 12.6), (6420, -30, 0.04, -5, 0, 2, 5, 12.8),
        (6540.0, -36.0, 0.05, 0.0, 0.0, 0.0, 3.0, 13.0), (6900.0, -41.0, 0.04, 0.0, 0.0, 0.0, 5.0, 13.5),
        (7639.0, -50.0, 0.09, 0.0, 0.0, 0.0, 5.0, 14.0), (8290.0, -49.0, 0.08, 0.0, 0.0, 0.0, 8.0, 15.0),
        (12100.0, -46.0, 0.07, 0.0, 0.0, 0.0, 5.0, 20.0)]
# Relative spectrum of a knock's splash. Each row: frequency in Hz, density in dB per Hz.
KNOCK_SPLASH_COLOUR = [(300, -25), (700, -8.5), (1200, 2), (1800, 0.5), (2400, -2.5), (3000, -12),
                       (4300, -18.5), (6000, -32.5), (9000, -64.5)]
RING_UP_S, RING_UP_AT_DB, QUICKEN = .0016, -35, .6  # a stronger knock sets the wall ringing sooner


def clinks(rattle_db=-20, rattle_s=0.008, splash_s=0.022, snap_db=-40, snap_s=0.003):
    """Each knock rings the wall's modes by how it lands, with a bright snap, a rattle and a splash."""
    out, (rattle, splash, snap) = np.zeros((2, N)), np.zeros((3, N))
    hz, mode_db, t60_s, round_db, up_db, slant_db, pan_db, lead = np.transpose(PAIL)[:, :, None]
    for s, db, hardness, around, up, slant, damping, splash_db in CLINKS:
        place_db = around * round_db + up * up_db + slant * slant_db
        height = amp(db + mode_db + hardness * np.log2(hz / 1500) + place_db)
        rise_s = RING_UP_S * amp(QUICKEN * (RING_UP_AT_DB - db))
        ring = wall_modes(hz, t60_s / damping)
        add(ring, 0, wetted_modes(hz))
        ring = height * ring * (1 - np.exp(-np.arange(ring.shape[1]) / SR / rise_s))
        right = ring * amp(-pan_db) * np.exp(-1j * lead)
        add(out, s, np.array([ring.sum(0), right.sum(0)]).imag)
        force = np.linalg.norm(height)
        add(rattle, s, force * amp(rattle_db + .5 * hardness) * puff(rattle_s, rise_s=rise_s / 2))
        add(splash, s, force * amp(splash_db) * puff(splash_s, rise_s=0.0016))
        add(snap, s, force * amp(snap_db + hardness) * puff(snap_s, rise_s=rise_s / 2))
    out += rattle * from_pail(rng.standard_normal((2, N)), SPRAY_COLOUR, size=512)
    out += splash * from_pail(rng.standard_normal((2, N)), KNOCK_SPLASH_COLOUR, size=512)
    return out + snap * rng.standard_normal((2, N))


BREAK_OFF_S = .098  # the ring breaks off soon after the knock


def wall_modes(hz, t60_s, slosh=0.001, split=0.008, twin_db=-13):
    """The pail is not quite round: each mode beats with a weaker twin, and the milk detunes both."""
    t = np.arange(SR // 3) / SR
    phase, shift, twin_phase, gap = rng.uniform(-1.01, 1, (4, len(hz), 1))
    main = np.exp(2j * np.pi * (hz * (1 + slosh * shift) * t + phase))
    beat_hz = hz * split * np.sign(gap) * (.5 + abs(gap))
    beat = 1 + amp(twin_db) * np.exp(2j * np.pi * (beat_hz * t + twin_phase))
    break_off = np.exp(-(t / BREAK_OFF_S) ** 4)
    return main * beat * amp(-60 * t / t60_s) * break_off


def wetted_modes(hz, spread=.055, t60_s=.06, crowd_db=-16, count=4):
    """Round each mode crowd short-lived ones of the wetted wall, roughening a knock's first moments."""
    t = np.arange(SR // 12) / SR
    phase, gap = rng.uniform(-0.92, 1, (2, count, len(hz), 1))
    crowd_hz = hz * (1 + spread * np.sign(gap) * np.sqrt(abs(gap)))
    crowd = np.exp(2j * np.pi * (crowd_hz * t + phase)).sum(0)
    return crowd * amp(crowd_db - 60 * t / t60_s)


def yard(x, t60_s=0.092, wet_db=-19):
    """Faint, short scatter from the cow, the ground and the house wall."""
    t = np.arange(SR // 4) / SR
    sparse = rng.standard_normal((2, len(t))) * (rng.random((2, len(t))) < 2000 / SR)
    taps = sparse * (t > .004) * amp(-60 * t / t60_s)
    taps /= np.linalg.norm(taps, axis=1, keepdims=True)
    return x + amp(wet_db) * signal.fftconvolve(x, taps, axes=1)[:, :N]


# Relative spectrum of the open air. Each row: frequency in Hz, density in dB per Hz.
AIR_COLOUR = [(25, -3.5), (80, 1), (200, 0), (400, -8.5), (1000, -17), (3000, -36.5), (8000, -56.5)]
AIR_DB = -91.5


def outdoor_air():
    """A very faint, steady low rush."""
    shape = amp(read(AIR_COLOUR, np.fft.rfftfreq(N, 1 / SR)))
    return amp(AIR_DB) * unit(irfft(rfft(rng.standard_normal((2, N))) * shape, N))


def scene():
    """All the sounds of the pail, in the yard."""
    stirring = churn()
    jets = hiss() + froth() + stirring + hollow(stirring) + hums() + gurgles()
    hits = plops() + ticks() + clinks()
    return yard(jets + hits) + outdoor_air()


EDGE_HZ = 15100


def record(dry, treble_hz=8000, floor_db=-98):
    """A dull microphone, a trace of electronic hiss, then the band limit."""
    dull = signal.sosfilt(signal.butter(N=3, Wn=treble_hz, fs=SR, output="sos"), dry)
    noisy = dull + amp(floor_db) * rng.standard_normal((2, N))
    lowpass = signal.firwin(511, EDGE_HZ, window=("kaiser", 9), fs=SR)
    return signal.oaconvolve(noisy, lowpass[None], "same", axes=1)


dry = scene()
out = record(dry)
wrap_up_sound(out)
```